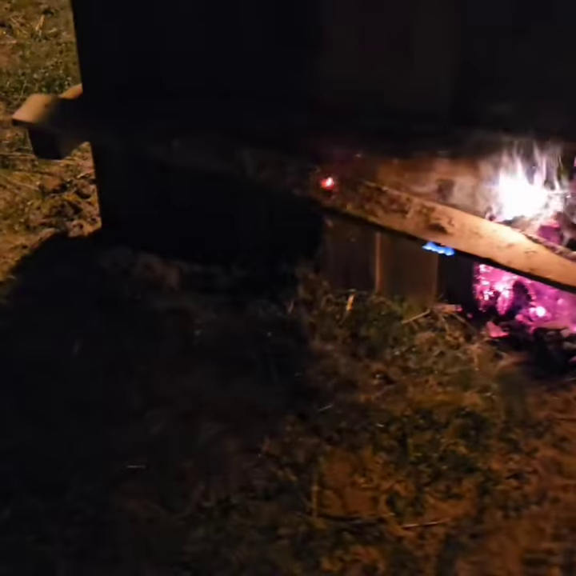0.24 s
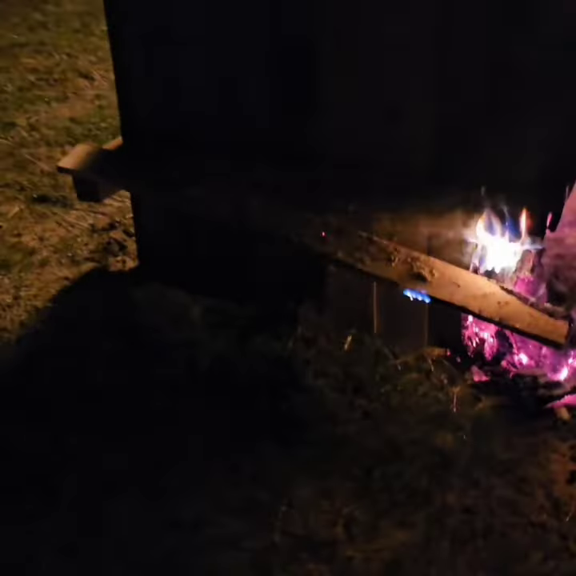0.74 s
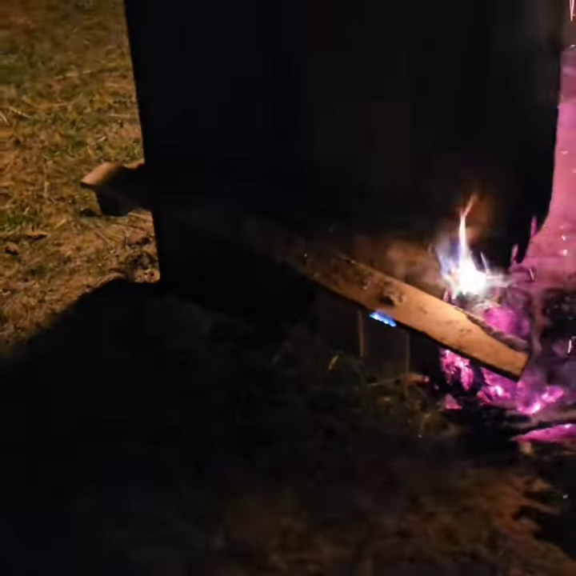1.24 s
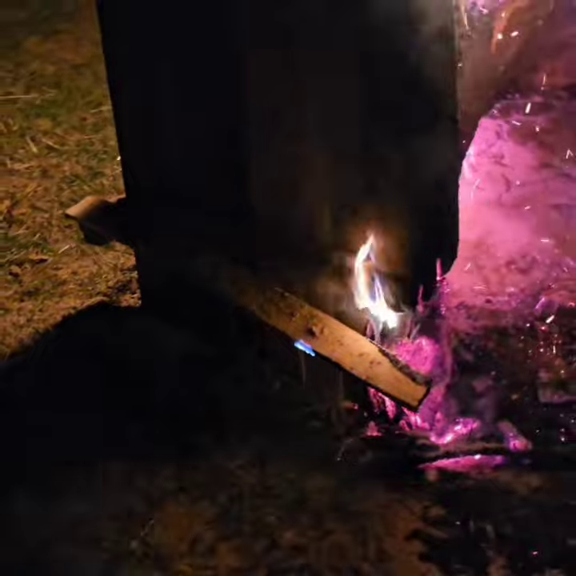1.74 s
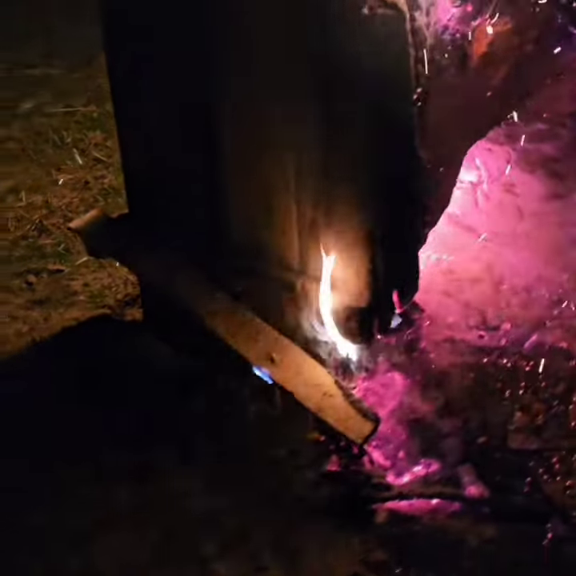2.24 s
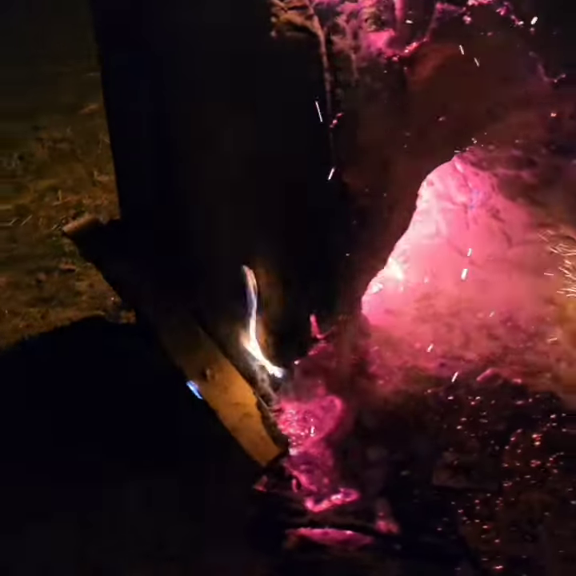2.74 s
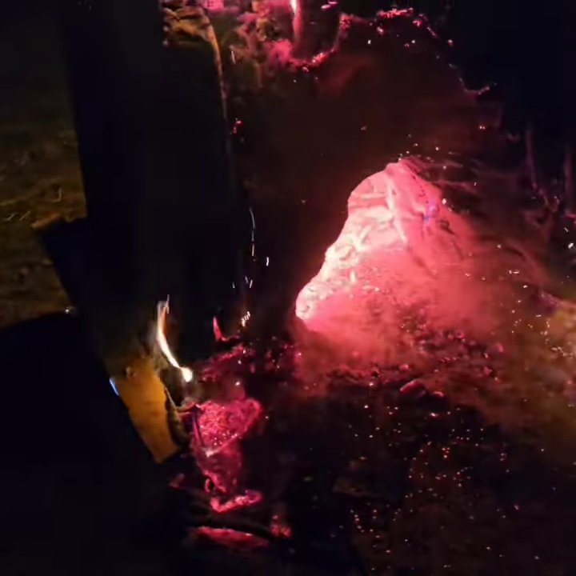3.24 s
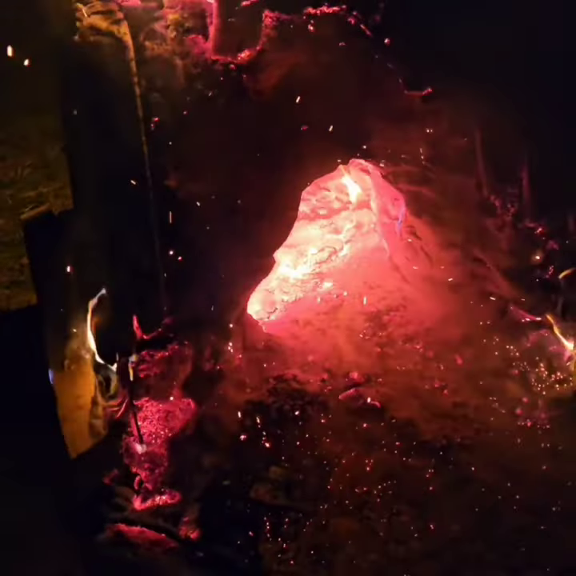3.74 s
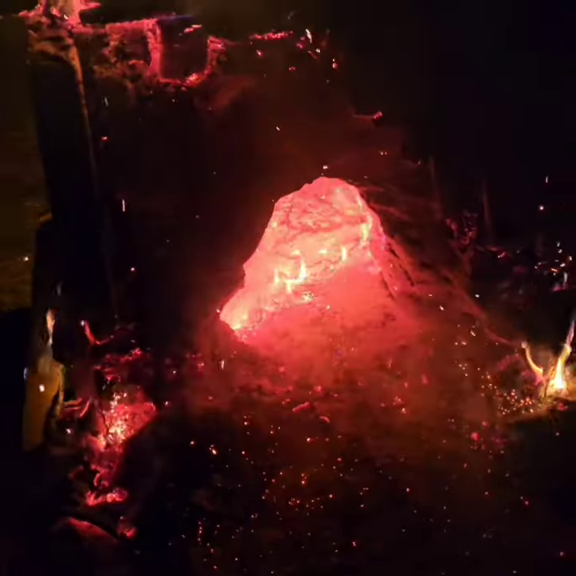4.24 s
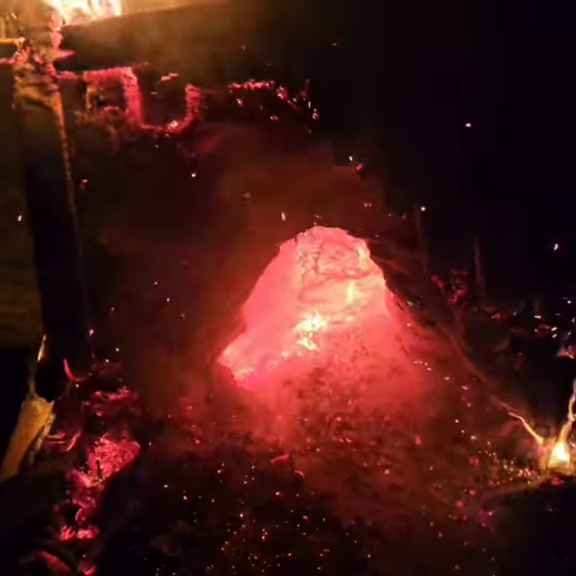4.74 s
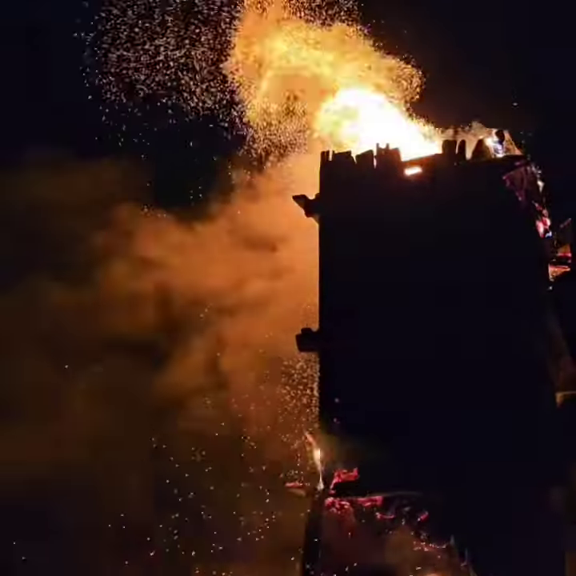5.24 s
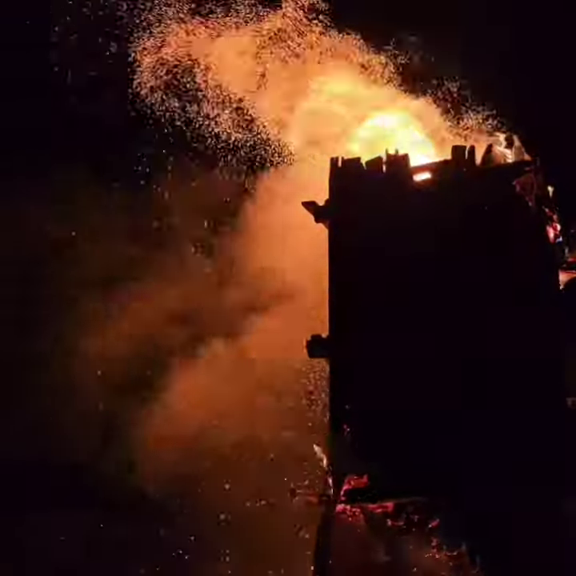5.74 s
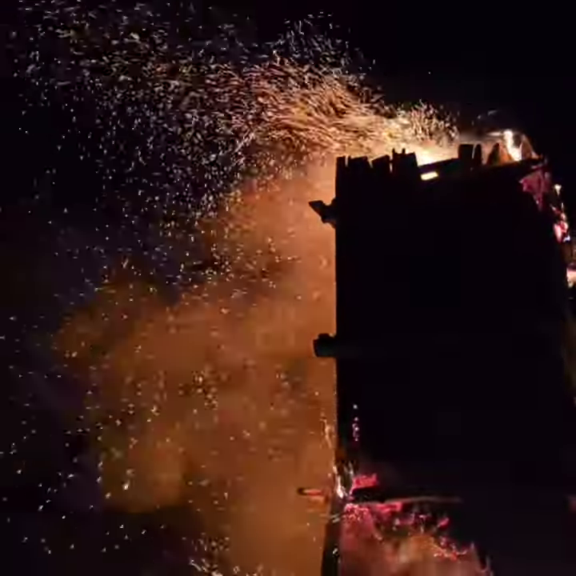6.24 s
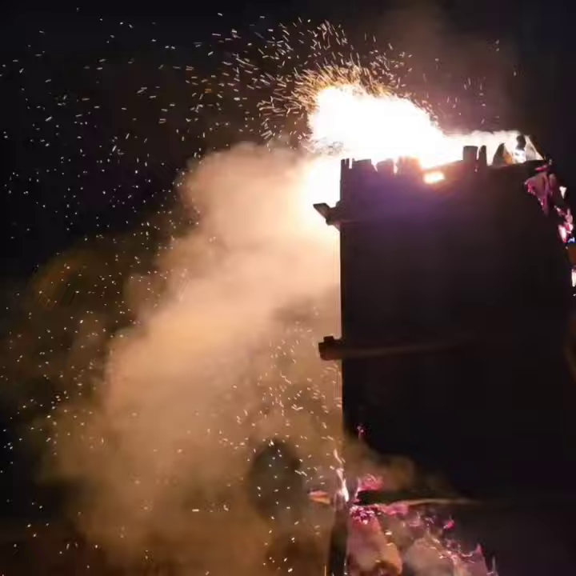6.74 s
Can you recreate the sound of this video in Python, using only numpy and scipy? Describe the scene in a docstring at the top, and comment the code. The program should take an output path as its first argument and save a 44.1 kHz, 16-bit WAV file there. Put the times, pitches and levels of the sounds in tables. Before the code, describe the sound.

Close to a burning stack of boards in a night field, irregular sharp pops and hard snaps jump out over deep flame rumble and soft fluttering. Steam hisses and spits briefly between them. Crickets trill continuously around. In the last second and a half the roar and crackle swell thickly. The microphone is near the fire, and the strongest cracks overload it.

```python
"""In a field at night a tall stack of boards burns close by.
Bursting steam pockets split the wood: shaped noise excites wood modes, and the strongest pops clip.
Flames rumble and flutter as coloured noise; the burning surface roars, crackles, ticks and hisses, and
swells near the end. Steam whistles as gliding tones, and two kinds of cricket sing as short sinking tones."""
import sys
import numpy as np
from scipy import signal
from scipy.fft import rfft, irfft, next_fast_len
from scipy.io import wavfile
from scipy.ndimage import uniform_filter1d

SR = 44100
rng = np.random.default_rng(int(sys.argv[2]) if len(sys.argv) > 2 else 0)


def master_out(mix):
    """Clip the mix to full scale and print it as 16-bit PCM to the path in sys.argv[1]."""
    frames = np.transpose(np.atleast_2d(mix))
    ceiling = np.clip(frames, -1, 1)
    pcm = np.round(ceiling * 32767).astype(np.int16)
    wavfile.write(sys.argv[1], SR, pcm)


N = 308991
TIME = np.arange(N) / SR

# wood splitting: (time [s], knock level before gain [dB], crack level before gain [dB],
# crack tilt [dB per register], board mode [Hz], splinter mode [Hz], time scale of the split [s])
WOOD_POPS = [(0.5528, -39.5, -44.5, 8.5, 526, 2220, 0.0039), (0.6386, -54, -40.5, 7.5, 440, 12090, 0.00018),
             (0.6583, -58, -37, 6, 470, 6380, 0.00018), (0.68, -35.5, -30, 1.5, 1630, 6380, 0.00068),
             (0.7039, -41, -40, 9, 440, 7280, 0.0012), (0.9328, -19.5, -20.5, -0.5, 1600, 6380, 0.00096),
             (0.9767, -23, -33, -2, 1600, 1880, 0.00076), (0.9931, -37, -23.5, -2, 440, 2860, 0.00035),
             (1.131, -24, -22, -2, 1640, 5800, 0.00045), (1.2685, -51, -43, -3, 610, 2700, 0.00024),
             (1.3447, -22, -26, 3, 523, 12400, 0.00072), (1.4708, -22.5, -33, -6.5, 545, 2700, 0.00056),
             (1.5328, -20.5, -19.5, -2.5, 980, 6550, 0.0013), (1.8878, -40, -38.5, -7, 450, 2350, 0.0011),
             (2.1035, -36, -26, 1, 570, 2900, 0.00031), (2.1491, -42, -19, 4.5, 1590, 10460, 0.00037),
             (2.183, -58, -34.5, 2.5, 440, 11570, 0.00013), (2.5017, -32, -34.5, 0, 1600, 2060, 0.00025),
             (2.526, -26.5, -23.5, -1, 430, 11700, 0.0013), (2.5826, -43, -38, -0.5, 1050, 2890, 0.00034),
             (2.619, -36.5, -31.5, 2.5, 1260, 7500, 0.0006), (3.325, -18, -20.5, 0.5, 1490, 7000, 0.00078),
             (3.392, -53, -40.5, 4.5, 440, 12360, 0.0004), (3.4945, -40.5, -22.5, 6.5, 1580, 12200, 0.001),
             (3.5418, -42, -34.5, -3, 440, 5950, 0.00088), (3.5614, -53, -39, 4, 470, 12920, 0.0012),
             (3.701, -63, -47, 16, 440, 13500, 0.001), (4.124, -50, -44, 5.5, 440, 10590, 0.0008),
             (4.2026, -48, -38, 5.5, 530, 12640, 0.00063), (4.2886, -51, -46.5, 9.5, 440, 12920, 0.0004),
             (4.317, -25, -36, -8.5, 440, 2530, 0.00053), (4.4398, -22, -15, 3.5, 1140, 7940, 0.0018),
             (4.445, -43, -24, 3, 1210, 13600, 0.0014), (4.5443, -44, -40, 4, 500, 5470, 0.00089),
             (4.5642, -57, -39.5, 2, 438, 13500, 0.0015), (4.6443, -37, -26, 2, 1610, 9700, 0.0004),
             (4.689, -55, -35, 2, 510, 5360, 0.0013), (4.766, -56, -13, 0, 1600, 6970, 0.00088),
             (5.2063, -26.5, -22, -7.5, 426, 2140, 0.00089), (5.3075, -35, -38, 1.5, 436, 2590, 0.0027),
             (5.441, -43, -22.5, 1, 440, 10200, 0.00067), (5.5249, -32.5, -31, -2, 430, 1990, 0.00074),
             (5.6619, -30.5, -33, 5, 430, 5720, 0.00078), (5.6933, -32, -20, 3.5, 1410, 11800, 0.002),
             (5.7555, -34.5, -27.5, 2, 440, 12600, 0.0019), (5.9122, -48, -39, 10.5, 440, 2220, 0.0023),
             (6.1373, -47, -42, 10.5, 1290, 9200, 0.0033), (6.223, -19.5, -16.5, 2, 1070, 7610, 0.0021),
             (6.4747, -39, -34.5, 10, 440, 12360, 0.0018), (6.573, -37, -38, 0, 1070, 2030, 0.0013),
             (6.629, -52, -36, 6.5, 450, 11070, 0.002), (6.72, -40, -33, 2, 438, 11830, 0.00018),
             (6.7945, -35, -29.5, 1, 440, 8880, 0.00039), (6.9168, -23.5, -19.5, -0.5, 1600, 4640, 0.00091),
             (6.9408, -24.5, -27.5, -1.5, 470, 1910, 0.0008)]
# edges of the knock register and the three crack registers above it: (frequency [Hz])
REGISTER_EDGES = [230, 1750, 4000, 8000, 16500]
REGISTER_FILTERS = [signal.butter(4, edges, "band", fs=SR, output="sos")
                    for edges in zip(REGISTER_EDGES, REGISTER_EDGES[1:])]


def undb(db):
    """Decibels to amplitude ratio: 20 dB is a factor of ten."""
    return 10 ** (np.asarray(db) / 20)


def curves(table):
    """Level contours: the columns of a table, interpolated linearly in time."""
    s, *columns = np.transpose(table)
    return [np.interp(TIME, s, column) for column in columns]


def unit(x):
    """Normalise the mean power: scale to rms 1."""
    return x / np.sqrt(np.mean(x ** 2))


def colour(x, points):
    """Spectral shaping: filter a sound by a (frequency [Hz], gain [dB]) contour, at rms 1."""
    hz, db = np.transpose(points)
    size = next_fast_len(N)
    bins = np.maximum(np.fft.rfftfreq(size, 1 / SR), 1)
    gain = undb(np.interp(np.log(bins), np.log(hz), db))
    return unit(irfft(rfft(x, size) * gain, size)[..., :N])


def walk(rate):
    """Slow random modulation: rate random levels per second, smoothed twice, at rms 1."""
    hold = max(int(SR / rate), 1)
    steps = np.repeat(rng.standard_normal(N // hold + 1), hold)
    smooth = uniform_filter1d(uniform_filter1d(steps, hold), hold)
    return unit(smooth[:N])


def add(track, s, sound):
    """Superposition: mix a sound into a track at time s."""
    i = int(s * SR)
    track[..., i:i + sound.shape[-1]] += sound[..., :N - i]


def spread(pair, side_db):
    """Stereo width by sum and difference: two unrelated sounds as mid and side, to left and right."""
    return pair[0] + undb(side_db) * pair[1] * np.array([[1], [-1]])


def resonance(x, hz, q):
    """One damped mode: a second-order resonator with gain 1 at its centre."""
    return signal.lfilter(*signal.iirpeak(min(hz, .4 * SR), q, SR), x)


def ticks(rate, scatter_db, tail_s):
    """Shot noise: random fractures per second with decaying noise tails, as mid and side sounds."""
    size = undb(scatter_db * np.minimum(rng.exponential(size=N), 3))
    clicks = size * (rng.random(N) < rate / SR)
    energy = signal.lfilter([1], [1, -np.exp(-2 / (tail_s * SR))], clicks ** 2)
    return unit(np.sqrt(energy + 1e-18) * rng.standard_normal((2, N)))


def pops(level_db=0.5, force=1.125, from_db=-26):
    """Impulsive fracture: each pop is a low gas puff and a knock under a tilted crack, straight ahead."""
    # modes of the slats and fibres, rung by every pop beside its own splinter: (frequency [Hz])
    wood_hz = [2810, 6100, 11660]
    out = np.zeros((2, N))
    t = TIME[:SR // 20]
    puff_hz, puff_s, puff_db = 260, 0.0041, -3.5  # level against the knock level in the table
    puff = np.sin(2 * np.pi * puff_hz * t) * np.exp(-t / puff_s)
    lift_db, lift_growth = 3.5, 0.23  # the splinter's register stands out, more so in hard cracks (dB per dB)
    for s, knock_db, crack_db, tilt_db, board_hz, splinter_hz, split_s in WOOD_POPS:
        own_register = np.arange(len(wood_hz)) == np.searchsorted(REGISTER_EDGES[2:-1], splinter_hz)
        own_lift_db = lift_db + lift_growth * max(crack_db - from_db, 0)
        cracks_db = crack_db + tilt_db * np.array([-1, 0, 1]) + own_lift_db * own_register
        levels_db = np.append(knock_db, cracks_db)
        rings_hz = np.append(board_hz, np.where(own_register, splinter_hz, wood_hz))
        # pops above from_db are expanded
        extra_db = (force - 1) * max(max(levels_db) - from_db, 0)
        add(out, s, undb(level_db + extra_db) * pop(levels_db, rings_hz, split_s))
        add(out, s, undb(knock_db + puff_db) * puff)
    return out


def pop(levels_db, rings_hz, split_s, kick=1.58, ring_db=4.5, ring_q=3.64, thud_db=4, tail_db=-17,
        side_db=-9, even=0.59):
    """Excitation and resonance: a pressure step and tearing noise ring the wood; the stack scatters it."""
    t = TIME[:SR // 20]
    tear, scatter, sideways = rng.standard_normal((3, len(t)))
    burst = tear * (1 - np.exp(-t / 0.00039)) * np.exp(-(t / (2.05 * split_s)) ** 2)
    burst[8:10] += kick * np.array([2, 1])  # the pressure step
    # the fracture itself is broad and even; the pitch comes from the wood
    spectrum = rfft(burst)
    evened = irfft(spectrum / np.abs(spectrum) ** min(even, 1), len(t))
    burst = evened * np.exp(-(t / (0.0065 + 2 * split_s)) ** 2)
    burst *= np.sqrt(split_s * SR / np.sum(burst ** 2))
    decay_s = .0028 + split_s / 2
    tail = spread([scatter, sideways], side_db) * undb(tail_db) * np.exp(-t / decay_s)
    burst = burst + tail
    burst = burst + undb(thud_db) * resonance(burst, 340, 0.35)  # the heavy board gives a dull thud
    # each register of the mid sound carries the energy of 5 ms at its level
    span = .005 * SR
    out = 0
    for db, sos, lo, hi in zip(levels_db, REGISTER_FILTERS, REGISTER_EDGES, REGISTER_EDGES[1:]):
        part = signal.sosfilt(sos, burst)
        rings = sum(resonance(part, hz, ring_q) for hz in rings_hz if lo < hz <= hi)
        part = part + undb(ring_db) * rings
        out = out + undb(db) * part * np.sqrt(span / np.sum(part.mean(axis=0) ** 2))
    return out


def flames():
    """Turbulent combustion noise: a deep rumble of the column and flutter of near tongues share gusts."""
    # flames: (time [s], rumble level before gain [dB], flutter level before gain [dB])
    flame_levels = [(0.0, -43, -57), (0.1, -38, -31.5), (0.23, -46, -36.5), (0.29, -32.5, -35.5),
                    (0.72, -31, -33.5), (4.43, -29.5, -32.5), (4.8, -30.5, -34.5), (4.86, -35, -31.5),
                    (5.01, -23, -39.5), (5.33, -29.5, -35.5), (5.48, -24, -34), (6.89, -28.5, -44.5),
                    (6.95, -22, -33.5), (7.01, -33, -43)]
    # spectrum of the rumble: (frequency [Hz], relative level [dB])
    rumble_colour = [(14, -10), (28, -6), (50, 1), (80, -3), (120, -10), (170, -25), (400, -118)]
    # spectrum of the flutter: (frequency [Hz], relative level [dB])
    flutter_colour = [(80, -6.5), (135, 3.5), (195, 1), (260, -7), (340, -15), (480, -31.5), (1000, -47)]
    rumble_db, flutter_db = curves(flame_levels)
    rumble = colour(rng.standard_normal((2, N)), rumble_colour)
    # level out the noise's own slow swell, so that the contour and the gusts set it
    rumble /= uniform_filter1d(rumble[0] ** 2, SR // 7) ** .5
    flutter = colour(rng.standard_normal((2, N)), flutter_colour)
    gust_db = 1.5 * walk(9)  # puffs of the draught
    rumble = rumble * undb(rumble_db + gust_db + 3.0)
    flutter = flutter * undb(flutter_db + gust_db + 2.2)
    return spread(rumble, -27) + spread(flutter, -26.5)


def blaze():
    """Modulated noise of burning boards: a flickering roar, dense crackle, steam and ember ticks."""
    # burning surface: (time [s], roar level before gain [dB], crackle level before gain [dB])
    blaze_levels = [(0.0, -54, -62), (0.33, -54, -78), (0.51, -53, -64), (0.96, -52, -67),
                    (1.11, -46.5, -53), (1.44, -44.5, -54), (1.73, -50.5, -59.5), (2.97, -54, -75),
                    (3.41, -48.5, -58), (3.57, -61, -65), (3.9, -60, -75), (4.31, -61, -69),
                    (4.66, -52.5, -53.5), (4.99, -61.5, -60.5), (5.21, -60, -56.5), (5.33, -55, -52),
                    (5.64, -41, -37.5), (5.76, -42.5, -42.5), (6.07, -39, -40.5), (6.22, -43.5, -44),
                    (6.61, -40, -48.5), (6.81, -44, -52), (7.01, -47, -50.5)]
    # spectrum of the roar: (frequency [Hz], relative level [dB])
    roar_colour = [(200, 7), (400, 3.5), (600, 0.5), (850, -3), (1400, -2.5), (1900, -10), (2800, -15),
                   (6000, -59)]
    # spectrum of the crackle: (frequency [Hz], relative level [dB])
    crackle_colour = [(700, -33), (1600, 2), (2400, 6), (3400, 1), (5500, 0.5), (7000, -3.5), (8200, -7.5),
                      (15000, -28)]
    roar_db, crackle_db = curves(blaze_levels)
    # a late gust feeds the flare; its width is the half-length to 1/e of the lift in dB
    surge_s, surge_width_s, surge_db = 6.46, 0.069, 3.5
    roar_db = roar_db + surge_db * np.exp(-((TIME - surge_s) / surge_width_s) ** 2)
    working = strain()
    flicker_db = 1.0 * walk(16)
    roar = colour(rng.standard_normal((2, N)), roar_colour)
    roar = roar * undb(roar_db + 5.0 + flicker_db + 0.84 * walk(40))
    crackle = colour(ticks(rate=2400, scatter_db=3.2, tail_s=0.0033), crackle_colour)
    crackle = crackle * undb(crackle_db + 7.0 + flicker_db)
    return spread(roar, -48) + spread(crackle + steam(crackle_db, working) + embers(working), -53)


def strain():
    """Saturating activity of the wood, 0 to 1: high where the pops crowd together."""
    fresh_s = 0.054  # decay to 1/e on either side of a pop, while the wood is strained and open
    return np.tanh(sum(np.exp(-np.abs(TIME - s) / fresh_s) for s, *_ in WOOD_POPS))


def steam(crackle_db, working):
    """Gas-jet noise: the burning surface steams evenly; fresh splits and pockets of sap sputter."""
    # sap boiling out as steam: (time [s], length [s], peak level before sputter [dB])
    sap_spits = [(0.303, 0.19, -44.5), (0.955, 0.033, -32), (1.155, .018, -40), (1.379, 0.011, -39),
                 (2.172, 0.025, -26), (2.414, .044, -52), (2.512, 0.022, -18), (2.71, 0.033, -47),
                 (3.209, 0.054, -42), (3.34, 0.065, -52), (3.526, 0.088, -43), (3.664, 0.043, -39),
                 (3.772, 0.081, -46), (3.984, .045, -54), (4.301, 0.037, -33), (4.5, 0.26, -49),
                 (4.818, .025, -42), (4.898, 0.024, -39), (5.122, .025, -43.5), (5.25, 0.051, -43),
                 (5.675, 0.032, -20), (6.707, 0.049, -33)]
    # spectrum of the steam: (frequency [Hz], relative level [dB])
    steam_colour = [(3000, -18), (6500, 1), (8500, 14), (12500, 19.5), (15000, 14), (17000, 19)]
    jet = undb(-58.5) * working ** 2  # freshly split wood
    for s, length_s, db in sap_spits:
        add(jet, s, undb(db) * np.hanning(int(length_s * SR)))
    sputter = undb(3.5 * walk(39))
    seep = undb(-68 + 5.5 * walk(55))
    surface = undb(crackle_db - 3.5)  # follows the crackle contour
    jet = jet * sputter + seep + surface
    grit = ticks(rate=980, scatter_db=4.0, tail_s=.004)
    return colour(grit, steam_colour) * jet


def embers(working):
    """Sparse shot noise, louder while the wood works: dry ticks of boards, fine ticks of charcoal."""
    wood = ticks(rate=18, scatter_db=6.0, tail_s=.004)
    wood = colour(wood, [(500, -6.5), (1500, 0.5), (3000, 1.0), (7000, 2), (9000, -12), (16000, -12)])
    coal = ticks(rate=35, scatter_db=6.0, tail_s=.005)
    coal = colour(coal, [(3000, -4), (6500, -5), (9000, -1.5), (12500, -1), (16000, 3)])
    return wood * undb(-61 + 6 * working) + coal * undb(-57 + 7 * working)


def squeaks(arch=0.075):
    """Pressure-driven whistle: a crack's pitch rises and falls with the steam, and jitter makes it rasp."""
    # steam squeezing through cracks: (time [s], length [s], pitch at full pressure before jitter [Hz],
    # peak level [dB], roughness [0-1])
    crack_whistles = [(2.426, .078, 1630, -41, .15), (3.72, .032, 1200, -50, .8),
                      (3.797, .055, 1090, -45, .8), (3.875, .06, 1540, -48, .7)]
    out = np.zeros(N)
    for s, length_s, hz, db, rough in crack_whistles:
        pressure = np.sin(np.linspace(0, np.pi, int(length_s * SR)))
        jitter = 0.17 * rough * walk(640)[:len(pressure)]
        pitch = hz * (1 + arch * (pressure - 1) + jitter)
        phase = 2 * np.pi * np.cumsum(pitch) / SR
        add(out, s, undb(db) * pressure * np.sin(phase))
    return out


def night():
    """Superposed distant sources: high field crickets, tree crickets an octave lower, and faint air."""
    # field cricket chorus: (time [s], level before gain [dB])
    chorus_levels = [(0.0, -42), (0.98, -40.5), (1.97, -43.5), (2.46, -41), (2.65, -44), (3.86, -44.5),
                     (5.8, -43), (7.01, -42.5)]
    # spectrum of the night air over the grass: (frequency [Hz], relative level [dB])
    air_colour = [(200, -5.5), (700, -18.5), (1500, -28), (2300, -0.5), (3000, -25.5), (4000, -21),
                  (6000, -24.5), (16000, -29)]
    chorus_db, = curves(chorus_levels)
    near = crickets(hz=4900, pitch_spread=.04, rate=28, stroke_s=.027, glide=.115, scatter_db=0.9, turn=3.0)
    far = crickets(hz=4876, pitch_spread=0.06, rate=350, stroke_s=0.0181, glide=0.067, scatter_db=-0.3,
                   turn=2.5)
    tree = crickets(hz=2311, pitch_spread=0.059, rate=440, stroke_s=.015, glide=0.05, scatter_db=-2.0,
                    turn=2.87)
    air = colour(rng.standard_normal((2, N)), air_colour)
    field = (near * undb(-1.0) + far * undb(-0.65)) * undb(chorus_db)
    return field + tree * undb(-48.0) + spread(air, 2.7) * undb(-54)


def crickets(hz, pitch_spread, rate, stroke_s, glide, scatter_db, turn):
    """Stridulation: random wing strokes, each a short tone that sinks as the scraper slows."""
    out = np.zeros((2, N))
    for when, bearing, detune, pace, sag, chance in rng.random((int(rate * N / SR), 6)):
        along = np.linspace(0, 1, int(stroke_s * (.5 + pace) * SR))
        pitch = hz * (1 + pitch_spread * (2 * detune - 1) + glide * (.5 + sag) * (.5 - along))
        phase = 2 * np.pi * np.cumsum(pitch) / SR
        size = undb(scatter_db * min(-np.log(chance), 3.5))
        # the bearing puts the tone out of step between left and right (turn in rad)
        offset = turn * (bearing - .5) * np.array([[1], [-1]])
        add(out, when * N / SR, size * np.sin(np.pi * along) ** 2 * np.sin(phase + offset))
    return out / np.std(out.mean(axis=0))


def scene():
    """Linear superposition: the fire in front, the crickets all around."""
    return pops() + flames() + blaze() + squeaks() + night()


def record(dry):
    """Overload and band limit: the level dips briefly at the start, peaks clip, and the top is cut."""
    dip_db = np.interp(TIME, [.03, .038, .06, .066], [3.0, -11, 3.0, -1.5])
    clipped = np.clip(dry * undb(dip_db), -1, 1)
    top_cut = signal.ellip(8, .2, 70, 15750, fs=SR, output="sos")  # low-pass edge in Hz
    return signal.sosfilt(top_cut, clipped)


dry = scene()
out = record(dry)
master_out(out)
```